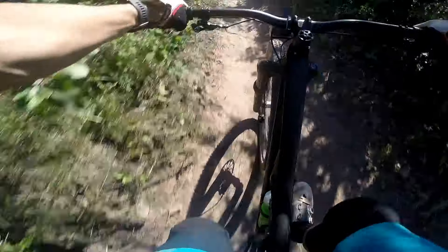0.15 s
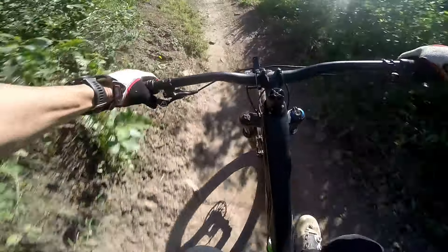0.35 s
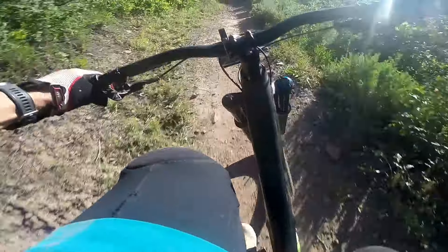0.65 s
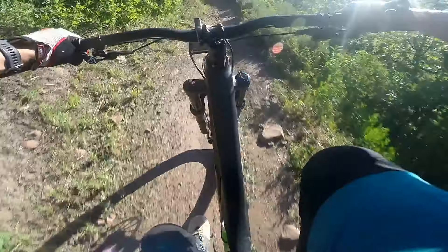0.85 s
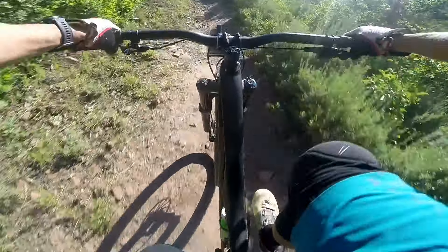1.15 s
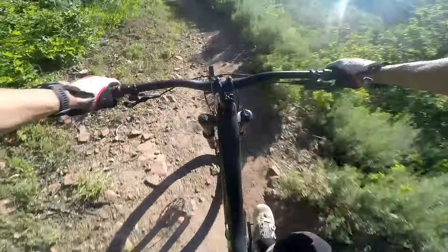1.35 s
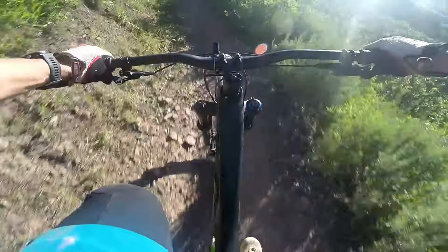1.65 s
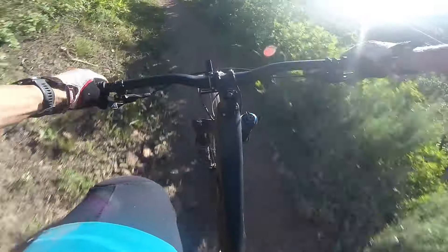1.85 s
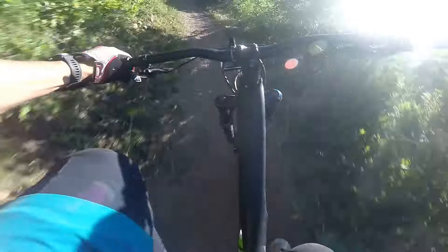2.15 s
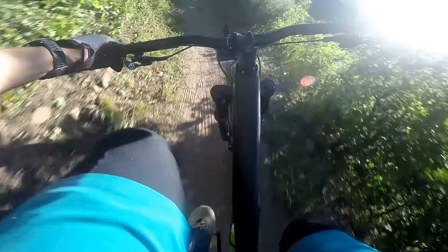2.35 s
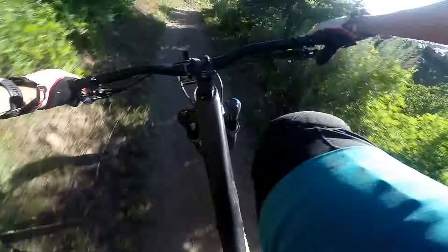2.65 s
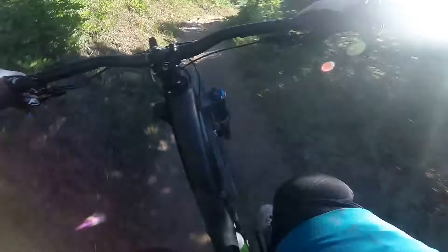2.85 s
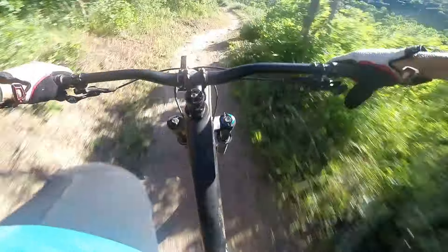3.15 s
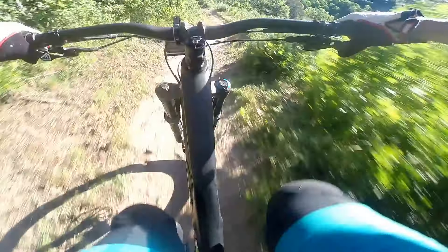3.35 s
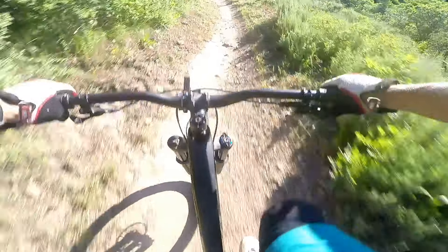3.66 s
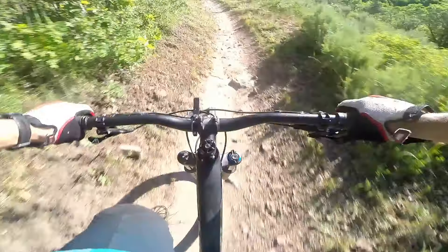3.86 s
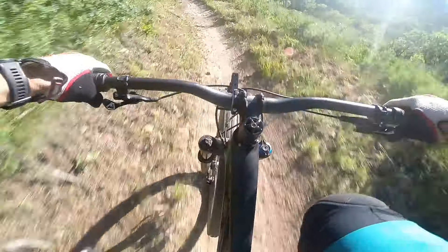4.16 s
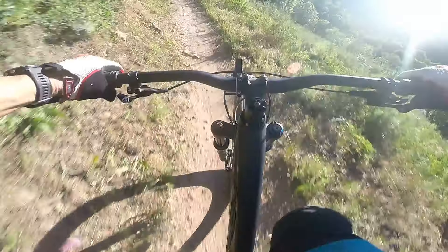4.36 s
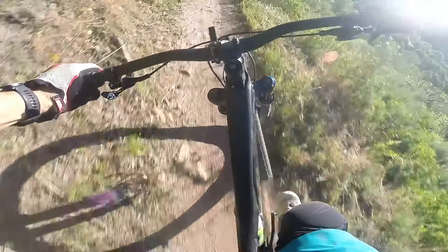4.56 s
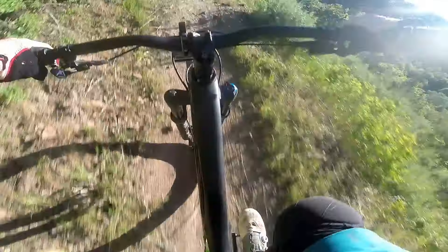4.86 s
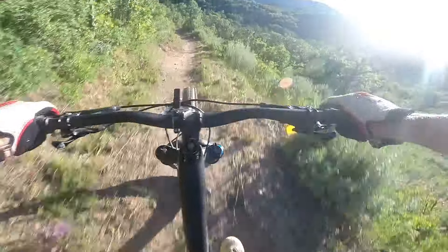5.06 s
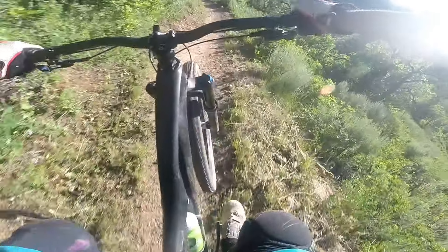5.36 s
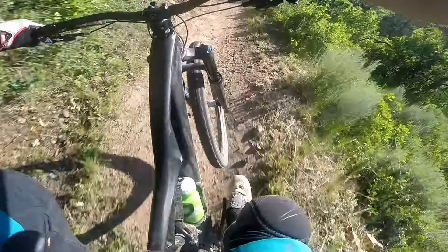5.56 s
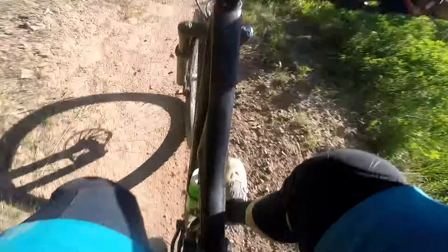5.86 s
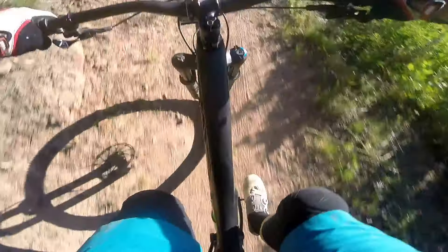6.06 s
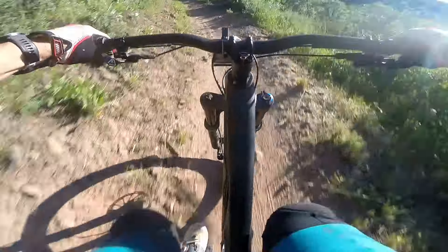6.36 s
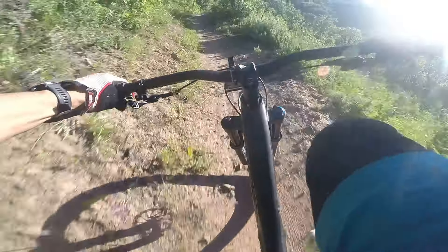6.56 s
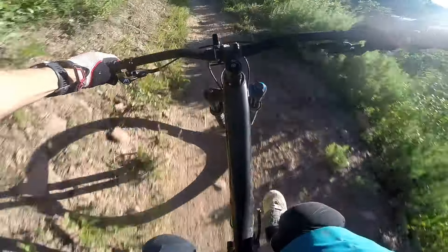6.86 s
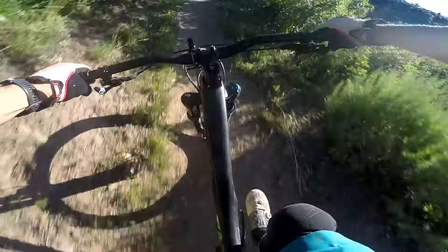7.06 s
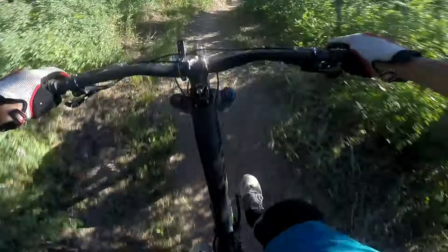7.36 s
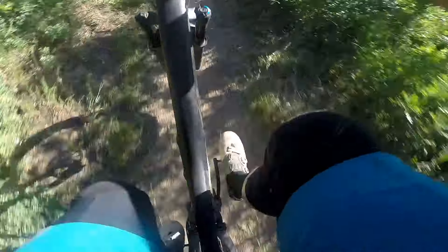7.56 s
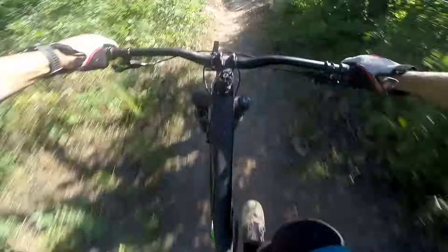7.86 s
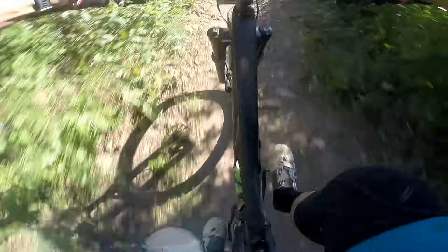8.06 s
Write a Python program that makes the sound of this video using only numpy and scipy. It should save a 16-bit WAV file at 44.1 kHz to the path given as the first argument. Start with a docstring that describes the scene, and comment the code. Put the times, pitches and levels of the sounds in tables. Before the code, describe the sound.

A small microphone sealed in a chest-mounted camera case hears an outdoor bike descent. The case clacks and rattles sharply in its mount while the strap thuds below. Between impacts, knobby tyres hum quietly and grit hisses, boxy and muffled, beneath low rumbling wind. A stone briefly pings a tube around the middle; rough hits then intensify, ease, and return strongly at the end.

```python
"""Fast mountain bike descent, from the chest

A dirt trail, heard from the rider's chest by one microphone inside a small camera case on a strap.
Air buffets the microphone as shaped noise; below, tyre knobs drone and grit hisses through the case.
The drivetrain whirrs thinly in narrow bands, and one stone pings off a tube as three ringing modes.
Closest are the jolts, decaying swings of the strap, and the camera knocking and rattling in its
mount: rough contacts that ring the modes of the case."""
import sys
import numpy as np
from scipy import signal
from scipy.fft import rfft, irfft
from scipy.io import wavfile
from scipy.ndimage import uniform_filter1d

SR = 44100
rng = np.random.default_rng(int(sys.argv[2]) if len(sys.argv) > 2 else 0)


def rack_gain(trim_db):
    """Turn a fader trim in dB into the linear factor to multiply a signal by."""
    fader = np.asarray(trim_db, float)
    return 10 ** (fader / 20)


def materialize(psi):
    """Save the field psi as 16-bit PCM at rate SR to the path in sys.argv[1].

    A 1-D psi becomes a single channel; in a 2-D psi each row is a channel.
    """
    bounded = np.clip(np.atleast_2d(psi).T, -1, 1)
    quanta = np.round(bounded * 32767).astype(np.int16)
    wavfile.write(sys.argv[1], SR, quanta)


N = 362061   # length in samples

# Air on the microphone, before its drifts. Each row: time in seconds, buffeting in dB, shudder in dB.
AIR_LEVELS = [(0.0, -36.5, -51.5), (0.41, -22, -41), (0.84, -39, -51), (1.62, -17, -41), (1.67, -30, -48),
              (1.94, -25.5, -43), (3.54, -32.5, -46), (3.77, -38.5, -44), (3.95, -19.5, -44.5),
              (4.78, -30, -49), (5.14, -31, -38), (5.58, -38, -47), (5.97, -20, -42), (6.65, -31, -52.5),
              (7.43, -29, -40.5), (7.7, -37.5, -46), (8.05, -15.5, -39), (8.21, -45, -64)]
# Spectrum of the buffeting. Each row: frequency in Hz, relative density in dB per Hz.
BUFFET_SPECTRUM = [(12, -2), (20, -1), (30, -1.5), (49, -15), (100, -22), (130, -59), (220, -120)]
# Tyres rolling, before their drifts. Each row: time in seconds, tyre drone in dB, grit hiss in dB.
ROLLING_LEVELS = [(0.0, -50, -54), (1.92, -53, -46), (2.4, -47.5, -52.5), (3.31, -55, -51),
                  (4.89, -46.5, -50.5), (5.17, -45, -47), (5.35, -56.5, -50), (5.69, -54.5, -53),
                  (5.99, -47.5, -43.5), (6.24, -50, -50.5), (6.81, -57, -52.5), (7.52, -52, -51),
                  (8.21, -57, -55)]
# The case as the hiss excites it. Each row: frequency in Hz, width in Hz, relative level in dB.
HISS_RESONANCES = [(596, 250, -4), (1007, 397, 4), (1444, 230, 7.5), (2045, 208, 7), (2418, 346, 6.5),
                   (3275, 170, -2), (3630, 200, -6.5), (4460, 2700, -15), (6680, 460, -15),
                   (7450, 250, -29), (9500, 2100, -35), (12300, 2400, -59.5)]
# Narrow bands of the drivetrain. Each row: frequency in Hz, width in Hz, relative level in dB.
WHIRR_BANDS = [(3795, 150, 10), (5315, 280, 9), (7560, 260, -2), (6020, 3600, -20)]
# Spells of drivetrain whirr. Each row: start in seconds, length in seconds, level in dB.
WHIRR_SPELLS = [(0.048, 0.63, -69), (1.801, 0.52, -65.5), (2.9, 0.3, -67), (4.25, 1.4, -70),
                (5.798, 0.15, -56.5), (6.749, 1.33, -68.5)]
# Modes of the tube that the stone hits. Each row: frequency in Hz, level in dB, t60 in seconds.
TUBE_MODES = [(460, -23, .03), (1070, -21, .07), (2200, -21, .03)]
# Jolts through the strap. Each row: start in seconds, level in dB before rise and decay,
# frequency in Hz, t60 in seconds.
STRAP_JOLTS = [(0.341, -26, 410, 0.027), (1.119, -21.5, 107, 0.036), (1.365, -19, 70, 0.07),
               (1.6, -20.5, 400, 0.034), (1.442, -10.5, 283, 0.016), (1.444, -4.5, 29, 0.1214),
               (1.589, -3, 134, 0.035), (1.584, -4.5, 40, 0.071), (2.945, -10.5, 27.2, 0.25),
               (3.491, -16.5, 29.7, 0.25), (7.12, -8.5, 27, 0.063), (7.385, -13.5, 30, 0.2),
               (7.385, -29, 259, 0.089), (6.021, -35, 230, 0.064), (6.31, -33.5, 230, .06),
               (5.041, -22, 260, 0.058), (3.899, -16, 31.7, 0.34), (4.948, -16.5, 122, 0.11),
               (4.984, -17.5, 127.8, 0.1), (5.17, -10, 142, 0.039), (5.169, -22, 625, 0.025),
               (5.235, -20.5, 280, 0.031), (5.911, -12, 132, 0.11), (5.959, -10.5, 229, 0.046),
               (5.852, -12, 26.74, 0.25), (5.973, -2.5, 36, 0.28), (5.979, -5, 122.5, 0.0872),
               (6.133, -6.5, 29, 0.15), (5.997, -5.5, 516, 0.018), (6.126, -15.5, 190, 0.035),
               (6.594, -24, 274, 0.018), (7.145, -15.5, 126, 0.13), (7.94, -7.5, 32.1, 0.16),
               (8.05, -9.5, 60, 0.086), (8.053, 5, 161, 0.022)]
# Rough stretches with light rattling. Each row: start in seconds, length in seconds, level in dB.
ROUGH_STRETCHES = [(0.366, 0.065, -42.5), (1.017, 0.074, -48), (1.275, 0.051, -44), (1.388, 0.045, -29.5),
                   (1.439, 0.042, -24), (1.507, 0.031, -25), (1.707, 0.029, -41), (1.766, 0.054, -42),
                   (1.872, 0.089, -37.5), (2.288, 0.16, -49.5), (2.87, 0.26, -40.5), (3.784, 0.039, -42),
                   (3.835, 0.053, -41), (3.929, 0.084, -46), (4.3, 0.29, -46), (4.806, 0.024, -39),
                   (4.859, 0.033, -28), (5.199, 0.068, -34), (5.332, 0.036, -35), (5.461, 0.045, -51),
                   (5.783, .055, -32), (5.886, 0.025, -28), (5.937, 0.071, -36), (6.145, 0.075, -55),
                   (6.289, 0.061, -38.5), (7.563, 0.023, -34), (7.88, 0.044, -34.5), (7.954, 0.055, -27.5),
                   (8.023, 0.031, -26)]
# Camera knocking in its mount. Each row: time in seconds, strength in dB, treble in dB relative to it.
MOUNT_KNOCKS = [(0.247, -38, 1.5), (0.341, -10, -45), (0.376, -26, -14), (0.391, -36.5, -6),
                (1.125, -51, 3), (1.189, -49, 5), (1.281, -37, 1), (1.302, -26, -9), (1.31, -27, -15),
                (1.3313, -23.5, -5), (1.338, -21, -11), (1.384, -4.5, -0.5), (1.3893, -16, -7),
                (1.441, -29, -10), (1.453, -23, 5), (1.463, -6.5, -5), (1.4741, -12, -9), (1.5003, -6, -5),
                (1.5123, -11, -8), (1.519, -13, -12), (1.532, -39, -2), (1.5784, -20, -6),
                (1.5924, -25, -11), (1.6416, -36, -6), (1.678, -23, -25), (1.7087, -29.5, 4.5),
                (1.7133, -14.5, -33), (1.7165, -27.5, -5), (1.7228, -22.5, -9), (1.728, -31.5, -6),
                (1.9248, -26, -14), (2.345, -22, -23.5), (2.9073, -21.5, -23), (2.9392, -32.5, -7),
                (2.967, -41.5, 10), (3.015, -38.5, 9), (3.049, -11, -39), (3.0753, -19.5, -30),
                (3.1028, -38, -2), (3.1064, -20.5, -23), (3.115, -24, -8), (3.124, -31.5, -1.5),
                (3.133, -43, -3), (3.190, -33.5, -2), (3.2069, -21, -26), (3.3257, -25.5, -19),
                (3.331, -13.5, -24), (3.341, -20.5, -24), (3.3547, -38.5, -1), (3.529, -37, -6),
                (3.789, -41.5, -2), (3.8375, -21.5, -19), (3.845, -29, -11), (3.851, -27, -27),
                (3.8901, -19, -17), (3.912, -20.5, -21), (3.993, -34, -10), (4.0172, -26, -19),
                (4.308, -30, -3), (4.447, -33, -1), (4.811, -31, -11), (4.8178, -22, -17),
                (4.830, -43, 3.5), (4.8652, -22.5, -14), (4.8693, -12, -41), (4.877, -23.5, -9),
                (4.9312, -25, -23), (5.046, -9, -58), (5.1707, -11, -48), (5.2275, -34, 4),
                (5.234, -29.5, 2), (5.242, -37, 6), (5.251, -14, -6), (5.2598, -18, -12),
                (5.263, -14, -1.5), (5.269, -15, 3), (5.317, -32, -1), (5.325, -23, -9),
                (5.328, -6.5, -5.5), (5.338, -27, -1), (5.342, -19.5, -12), (5.350, -29, -6),
                (5.3968, -17, -25), (5.4082, -20.5, -6), (5.4238, -37, -6), (5.441, -18, -10),
                (5.4668, -30, -12), (5.476, -31, -6), (5.589, -14, -39.5), (5.5944, -29, 2.5),
                (5.6117, -29.5, -1), (5.6482, -14.5, -20), (5.813, -26, -14), (5.8253, -11, -20),
                (5.828, -22, 5), (5.8333, -23, 4), (5.8361, -7.5, -5.5), (5.8792, -7, -18),
                (5.8843, -8, -12), (5.8904, -18, -25), (5.958, -16, -35), (5.9724, -24.5, -13),
                (5.993, -27, -16), (5.9985, -16, -45), (6.0327, -18, -34), (6.069, -22.5, -2.5),
                (6.1, -18, -29), (6.1091, -22, 0), (6.148, -39, -6), (6.248, -27, -2), (6.259, -26.5, -8.5),
                (6.322, -16, -24.5), (6.483, -25, -22), (7.4592, -24.5, -8), (7.4631, -21.5, -18),
                (7.551, -22.5, 1), (7.5548, -19.5, 0), (7.562, -22, -8), (7.575, -21, -25),
                (7.609, -36.5, 1.5), (7.654, -28, -5.5), (7.722, -25, -26), (7.7402, -16, 0.5),
                (7.7484, -15, -16), (7.855, -30, -29), (7.932, -10, -10), (7.9553, -7, -4),
                (7.9625, -7.5, -7), (7.9761, -16.5, -19), (7.985, -16, -10), (7.995, -16, -19),
                (8.028, -18, -44), (8.044, -31, -3), (8.057, -28.5, 3.5), (8.1212, -37, -10),
                (8.1272, -34, -6.5)]
# Modes of the camera case. Each row: frequency in Hz, relative level in dB, t60 in seconds.
CASE_MODES = [(550, -15, 0.027), (1130, -7.5, 0.016), (1496, -2.5, 0.021), (2110, 0.5, 0.011),
              (2573, -2, 0.016), (3294, -1, 0.0089), (4200, -1.5, 0.0043), (5140, -4.5, 0.009),
              (6250, -3, 0.004), (6980, -2.5, 0.0032), (9170, -12, 0.0031), (9330, -12, 0.0028),
              (11710, -8, 0.0055), (13300, -11, 0.003)]

LUMP_DB, LUMPS_HZ = 4.5, 3.7     # slow drift of the buffeting
EDDY_DB, EDDIES_HZ = 2.5, 17     # quick eddies lift lumps and shudder together
SCUFF_DB, SCUFF_FADE_S = -17.5, 0.008   # extra grit hiss, relative to the level of a rough stretch
WHIRR_REST_DB, WHIRR_FADE_S = -74, 0.2
PING_S = 5.041
JOLT_RISE_CYCLES = 0.094         # time constant of the push
RATTLES_PER_S, RATTLE_SPREAD_DB = 85, 9   # touches fall up to this far above or below
RATTLE_SHARPEST_DB, RATTLE_DULLEST_DB = -9.5, -32.5   # treble relative to the touch
RATTLE_DULL_GAIN = 0.23          # dB louder per dB of lost treble
CONTACT_GRIT, CONTACT_GRIT_S = 0.18, 0.0003   # grains just after the contact; both grow when it skids
CRACK_DB, CRACK_LOW_HZ, CRACK_HIGH_HZ = -6, 2000, 8500   # bare snap beside the ringing


def rms_one(x):
    """Scale to rms 1."""
    return x / np.sqrt(np.mean(x ** 2) + 1e-20)


def in_time(rows):
    """Each level column of a curve, interpolated sample by sample."""
    s, *columns = np.transpose(rows)
    return [np.interp(np.arange(N) / SR, s, c) for c in columns]


def drift(rate_hz):
    """Slow chance with spread 1: two-pole filtered noise, made at every 40th sample."""
    r = np.exp(-2 * np.pi * rate_hz * 40 / SR)
    slow = signal.lfilter([1], [1, -2 * r, r * r], rng.standard_normal(N // 40 + 2002))[2000:]
    return np.interp(np.arange(N) / 40, np.arange(len(slow)), rms_one(slow))


def band(x, low_hz, high_hz, order=2):
    """Butterworth band-pass."""
    return signal.sosfilt(signal.butter(order, [low_hz, high_hz], "band", fs=SR, output="sos"), x)


def low_pass(x, cut_hz, order):
    """Butterworth low-pass."""
    return signal.sosfilt(signal.butter(order, cut_hz, fs=SR, output="sos"), x)


def ring(clicks, hz, t60):
    """A unit click sets a decaying sine of height 1 ringing."""
    r = rack_gain(-60 / (max(t60, .002) * SR))
    w = 2 * np.pi * hz / SR
    return signal.lfilter([0, np.sin(w)], [1, -2 * r * np.cos(w), r * r], clicks + 1e-18)


def resonances(x, peaks, patchy_db):
    """Parallel resonances, signs alternating, each flickering on its own; rms 1."""
    out = 0
    for k, (hz, width_hz, db) in enumerate(peaks):
        r = np.exp(-np.pi * width_hz / SR)
        poles = [1, -2 * r * np.cos(2 * np.pi * hz / SR), r * r]
        one = signal.lfilter([1 - r * r, 0, r * r - 1], poles, x)
        out = out + (-1) ** k * rack_gain(db + patchy_db * drift(13.0)) * one
    return rms_one(out)


def spells(rows, fade_s):
    """Gain over time from rows (start, length, dB), each fading in and out."""
    t = np.arange(N) / SR
    gain = 0
    for s, length, db in rows:
        inside = np.minimum(t - s, s + length - t)
        gain = gain + rack_gain(db) * np.clip(inside / fade_s + .5, 0, 1)
    return gain


def preamplifier_hiss():
    """Steady electronic noise of the microphone preamplifier."""
    return rack_gain(-76) * rms_one(band(rng.standard_normal(N), 5000, 12000))


def air():
    """Turbulence at the microphone port: slow lumps, and a faster shudder above them."""
    buffet_db, shudder_db = in_time(AIR_LEVELS)
    hz = np.fft.rfftfreq(N, 1 / SR) + 1   # keeps the logarithm finite
    at_hz, density_db = np.transpose(BUFFET_SPECTRUM)
    shape = rack_gain(np.interp(np.log(hz), np.log(at_hz), density_db))
    lumps = irfft(rfft(rng.standard_normal(N)) * shape, N)
    # evened out, so that the gusts set the height, not chance
    lumps /= np.sqrt(uniform_filter1d(lumps ** 2, size=9000) + np.mean(lumps ** 2))
    shudder = rms_one(band(rng.standard_normal(N), 21, 132.4)) * rack_gain(3.3 * drift(25.0))
    gust = rack_gain(buffet_db + LUMP_DB * drift(LUMPS_HZ)) * lumps + rack_gain(shudder_db) * shudder
    return rack_gain(EDDY_DB * drift(EDDIES_HZ)) * gust


def grit():
    """Dense grains of uneven size and bunching, over smooth noise."""
    sizes = rack_gain(5.5 * np.minimum(rng.exponential(1, N), 3)) * rng.choice([-1, 1], N)
    grains_per_s = 1200 * rack_gain(5.0 * drift(20))
    grains = sizes * (rng.random(N) < grains_per_s / SR)
    return 0.74 * rms_one(grains) + rng.standard_normal(N)


def drivetrain(crunch):
    """A thin whirr: the crunch of the grit through narrow bands, stronger in spells."""
    whirr = resonances(band(crunch, 1940, 8200), WHIRR_BANDS, patchy_db=2.5)
    level = rack_gain(WHIRR_REST_DB) + spells(WHIRR_SPELLS, WHIRR_FADE_S)
    return level * rack_gain(2.5 * drift(50)) * whirr


def tyre_drone():
    """Knobs drone near 270 Hz, with a wider band of noise around them."""
    drone_db, _ = in_time(ROLLING_LEVELS)
    knobs = band(rng.standard_normal(N), 226.0, 301.6)
    drone = rms_one(knobs + 0.3 * band(rng.standard_normal(N), 240, 606))
    return rack_gain(drone_db + 2.0 * drift(15.0)) * drone


def tyre_hiss(crunch):
    """Grit crunches through the resonances of the case, swelling in the rough stretches."""
    _, hiss_db = in_time(ROLLING_LEVELS)
    level = rack_gain(hiss_db) + rack_gain(SCUFF_DB) * spells(ROUGH_STRETCHES, SCUFF_FADE_S)
    return level * resonances(crunch, HISS_RESONANCES, patchy_db=2.0)


def stone_ping():
    """A stone hits a tube: one blunt click rings its modes."""
    click = np.zeros(N)
    click[round(PING_S * SR)] = 1
    click = low_pass(click, 3500, order=2)
    return sum(rack_gain(db) * ring(click, hz, t60) for hz, db, t60 in TUBE_MODES)


def jolts():
    """A soft push sets the strap swinging, with a crunch of webbing above it."""
    out, t = np.zeros(N + SR), np.arange(SR // 2) / SR
    crunch = rms_one(band(rng.standard_normal(N + SR), 94, 507))
    for s, db, hz, t60 in STRAP_JOLTS:
        span = slice(round(s * SR), round(s * SR) + len(t))
        webbing = rack_gain(-17.5) * np.clip(hz / 100, 0, 1) * crunch[span]   # less in slow swings
        swing = np.sin(2 * np.pi * hz * t) + webbing
        rise = 1 - np.exp(-t * hz / JOLT_RISE_CYCLES)
        out[span] += swing * rack_gain(db - 60 * t / t60) * rise
    return out[:N]


def rattle():
    """Light touches, unevenly spaced through each rough stretch: rows like those of MOUNT_KNOCKS."""
    rows = []
    for start, length, db in ROUGH_STRETCHES:
        draw = rng.random((24, 3))[:max(round(length * RATTLES_PER_S), 2)]
        slots = (np.arange(len(draw)) + draw[:, 0]) / len(draw)
        treble_db = RATTLE_SHARPEST_DB + (RATTLE_DULLEST_DB - RATTLE_SHARPEST_DB) * draw[:, 2]
        touch_db = db + RATTLE_SPREAD_DB * (2 * draw[:, 1] - 1) - RATTLE_DULL_GAIN * treble_db
        rows += zip(start + length * slots, touch_db, treble_db)
    return rows


def contacts(treble_db, skid, t):
    """Forces of the knocks: a rough contact, longer when dull, with loose parts chattering around it."""
    rough = rng.standard_normal((len(treble_db), len(t)))
    fade_db = np.where(t < 0, -44 + 60 * t / 0.02, -33 - 60 * t / 0.032)
    chatter = rough * rack_gain(fade_db + 7 * rng.standard_normal(rough.shape))
    grains = np.sqrt(skid) * rough * np.exp(-np.abs(t) / (CONTACT_GRIT_S * skid))
    contact = (t == 0) + (t > 0) * CONTACT_GRIT * grains
    contact /= np.sqrt(np.sum(contact ** 2, axis=1, keepdims=True))
    sharp = contact + chatter * rack_gain(2.0 - 60 * np.abs(t) / 0.045)   # duller away from the contact
    contact_s = 2.5e-5 * rack_gain(-.4 * treble_db[:, None])
    after = np.maximum(t, 0) / contact_s
    pulse = after * np.exp(-after)
    soft = signal.fftconvolve(contact + chatter, pulse[:, SR // 60:], axes=1)[:, :len(t)]
    return sharp, soft / np.sum(pulse, axis=1, keepdims=True)


def knocks():
    """The camera knocks and rattles in its mount: each contact rings the case and snaps by itself."""
    s, strength_db, treble_db = np.transpose(MOUNT_KNOCKS + rattle())
    t = np.arange(-SR // 60, SR // 30) / SR
    at = (np.round(s * SR).astype(int)[:, None] + np.arange(len(t)) - SR // 60).ravel()
    skid = rack_gain(2 * np.maximum(treble_db, 0))[:, None]   # the brightest touches skid instead of landing
    sharp, soft = contacts(treble_db, skid, t)
    chance = rng.standard_normal((len(s), len(CASE_MODES)))
    spot = rng.integers(0, 3, len(s))   # the case is held at three spots, each shifting its modes

    def placed(forces):
        return np.bincount(at, forces.ravel(), N + len(t))[:N]

    body, treble = np.zeros(N), np.zeros(N)
    for k, (hz, db, t60) in enumerate(CASE_MODES):
        bright, sign = hz > 4200, (-1) ** k
        tilt_db = bright * treble_db * (hz / 5200) ** .4
        strength = rack_gain(strength_db + db + tilt_db + 2 * chance[:, k]) * sign
        for place in range(3):
            force = placed(((spot == place) * strength)[:, None] * (sharp if bright else soft))
            shift = (.05 - .03 * bright) * (place - 1) * sign
            rung = ring(force, hz * (1 + shift), t60)
            if bright:
                treble += rung
            else:
                body += rung
    crack = placed(rack_gain(strength_db + treble_db + CRACK_DB)[:, None] * np.sqrt(skid) * sharp)
    ringing = band(body, 330, 13000) + band(treble, 2400, 16000)
    return ringing + band(crack, CRACK_LOW_HZ, CRACK_HIGH_HZ, order=1)


def scene():
    """Everything reaches one microphone inside the case."""
    crunch = grit()
    rolling = drivetrain(crunch) + tyre_drone() + tyre_hiss(crunch)
    return (air() + rolling + stone_ping() + jolts() + knocks())[None]


def gain_control(heard):
    """Ducks after peaks above -9 dB, by 0.28 dB per dB over, then recovers at 30 dB per second."""
    over_db = 0.28 * np.maximum(20 * np.log10(np.abs(heard[0]) + 1e-9) + 9, 0)
    release_db = 30 * np.arange(N) / SR
    duck_db = np.maximum.accumulate(over_db + release_db) - release_db
    slow = np.exp(-1 / (0.018 * SR))   # smoothed over 18 ms
    return heard * rack_gain(-signal.lfilter([1 - slow], [1, -slow], duck_db))


def band_limit(x):
    """A steep low-pass at the top of the band."""
    return signal.sosfilt(signal.butter(12, 16120, fs=SR, output="sos"), x)


def record(dry):
    """The sealed port dulls the top, the preamplifier hisses, gain control ducks, loud peaks round off."""
    dull = low_pass(dry, 10760, order=6)
    ducked = gain_control(dull + preamplifier_hiss())
    finished = ducked / (1 + ducked ** 6) ** (1 / 6)   # soft limit at full scale
    return band_limit(finished)


dry = scene()
out = record(dry)
materialize(out)
```